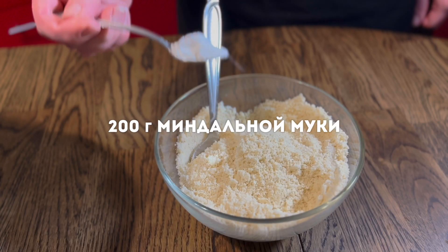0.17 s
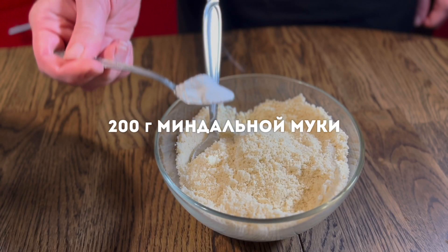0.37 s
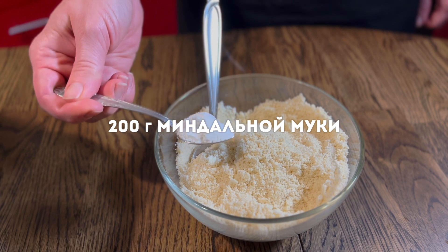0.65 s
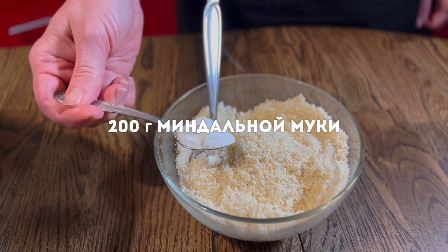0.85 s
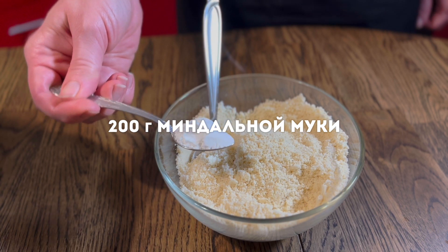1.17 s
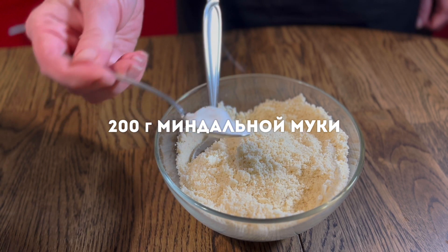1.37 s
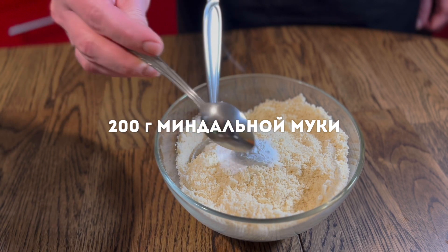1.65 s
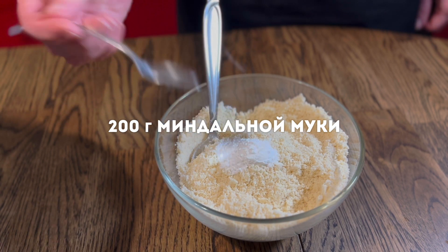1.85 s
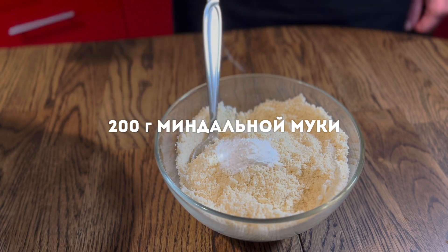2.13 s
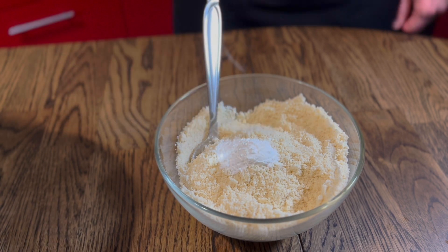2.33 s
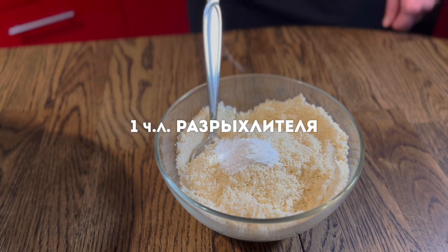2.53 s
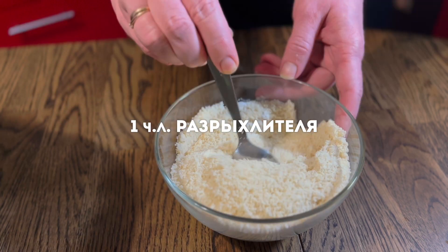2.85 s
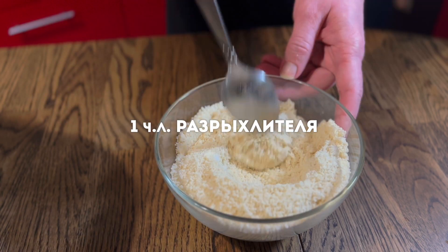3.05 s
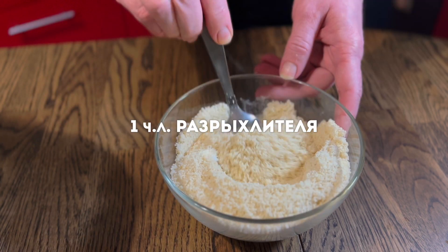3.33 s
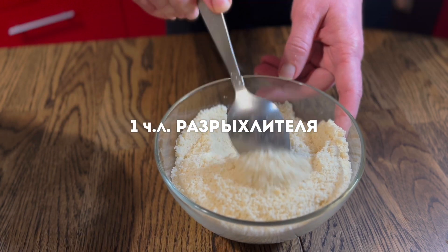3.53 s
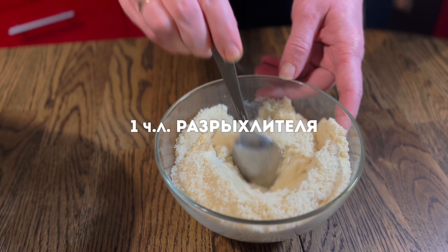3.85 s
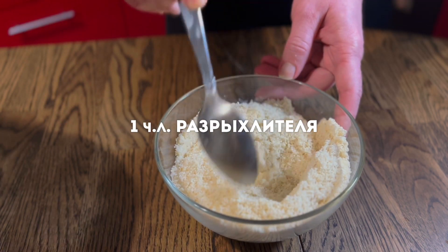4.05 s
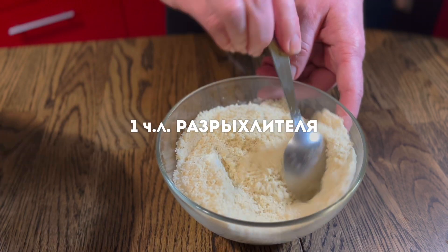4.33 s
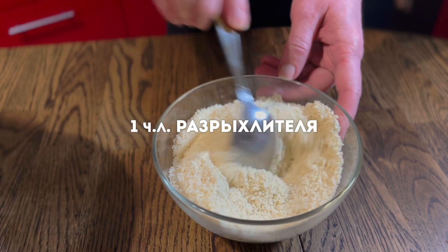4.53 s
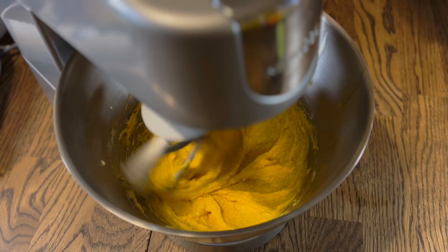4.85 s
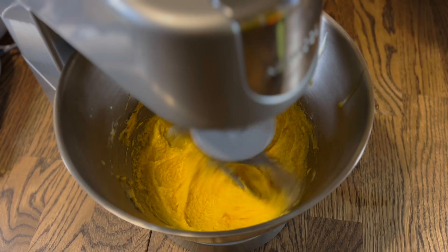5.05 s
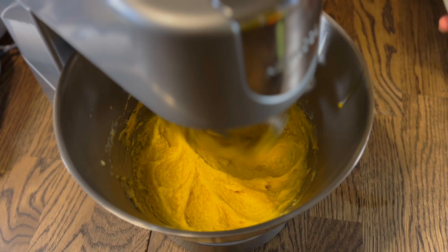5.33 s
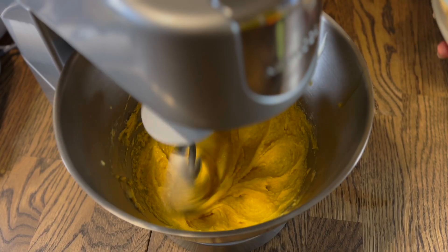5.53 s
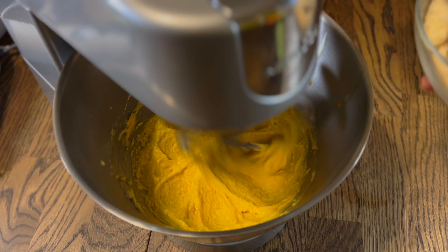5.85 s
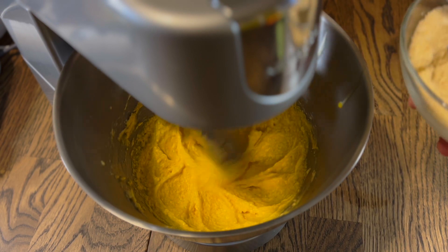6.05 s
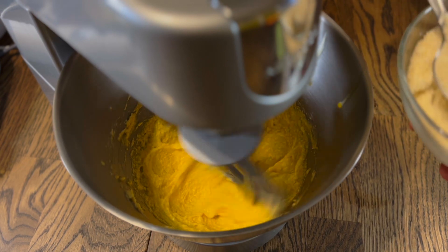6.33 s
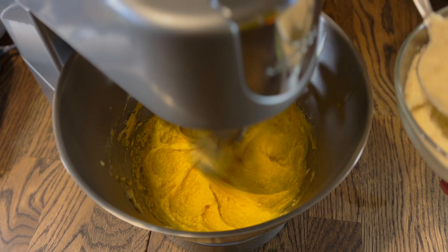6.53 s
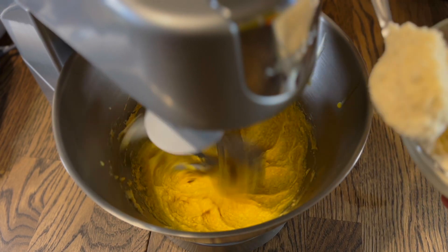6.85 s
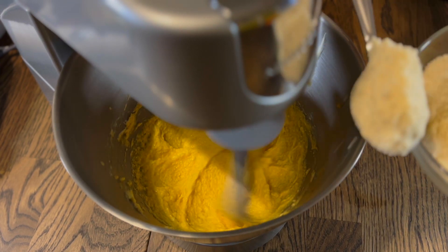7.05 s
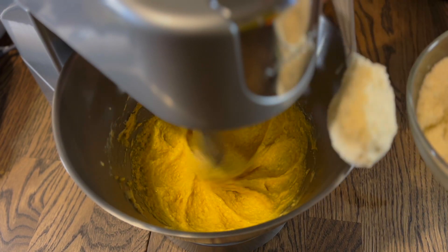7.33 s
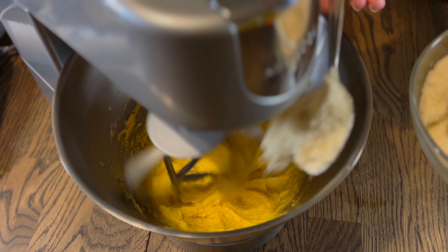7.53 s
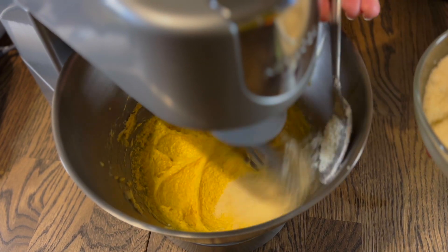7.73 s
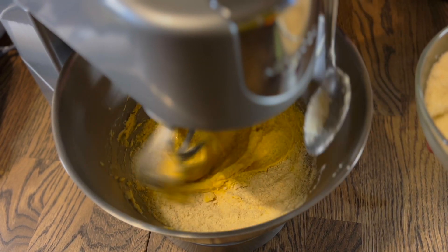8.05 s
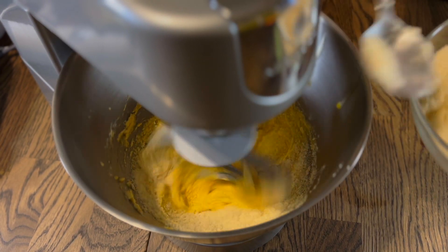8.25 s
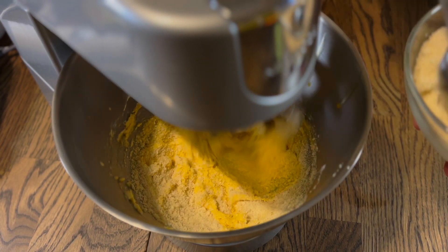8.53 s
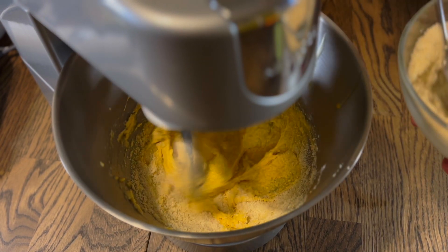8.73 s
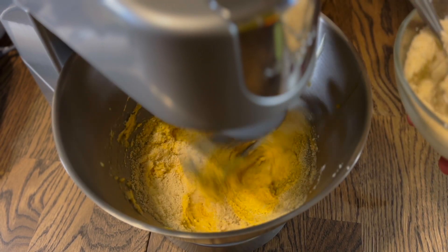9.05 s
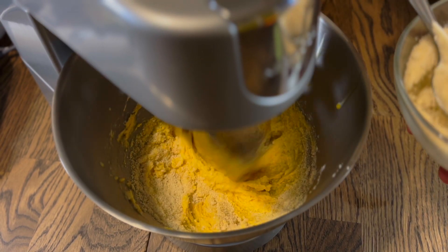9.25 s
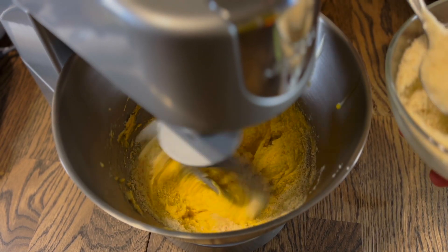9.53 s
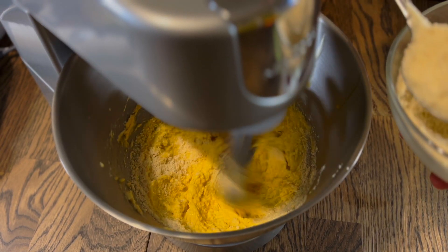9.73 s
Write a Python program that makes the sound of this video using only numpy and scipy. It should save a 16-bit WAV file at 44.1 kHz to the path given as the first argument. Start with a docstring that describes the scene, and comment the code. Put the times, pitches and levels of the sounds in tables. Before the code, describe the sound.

From 0 s an electric stand mixer runs across a small kitchen: a blurred, fluttering whine near 2 kHz over low hum, gear chatter and faint fan hiss. Around 2.8-2.9 s a glass bowl gives several soft low thuds on a wooden table. Spoon strikes on the glass follow at 3.2 s, bright and ringing, and at 3.3 s, duller, with bowl knocks; a quick double click comes at 4.2 s and a sharp, dry one at 4.76 s. At 4.8 s the sound cuts abruptly to the mixer close by, much louder, its whine clear, with rough growling gears and stronger hiss. Until the end near 10 s the whine dips briefly at irregular bites while the rattle surges and hushes. Small spoon taps on steel come at 5.3 s, faint, 7.4 s, clearest, 8.6 and 8.9 s. Close stereo, short room tail.

```python
"""An electric stand mixer whines, rattles, hums and hisses as it beats batter, first from across a kitchen.
A spoon clicks on a glass bowl that knocks on a wooden table; then, all at once, the mixer is heard from
close by, sagging and growling, with spoon taps on its steel bowl. Shaft-locked tones and filtered noise
make the mixer; noise cracks and damped modes make the spoon and bowls, with a short room tail."""
import sys
import numpy as np
from scipy import signal
from scipy.fft import rfft, irfft, next_fast_len
from scipy.io import wavfile
from scipy.ndimage import map_coordinates

SR = 44100
rng = np.random.default_rng(int(sys.argv[2]) if len(sys.argv) > 2 else 0)


def digitize_waveform(pressure):
    """Quantize a signal to 16-bit integers and store it at the path in sys.argv[1].

    Rows of a 2-D input are taken as channels; values are limited to [-1, 1].
    """
    field = np.atleast_2d(pressure).T
    bounded = np.clip(field, -1, 1)
    quanta = np.round(bounded * 32767).astype(np.int16)
    wavfile.write(sys.argv[1], SR, quanta)


N = 435686
TIME = np.arange(N) / SR
STRIKE_T = np.arange(SR // 3) / SR  # time since a strike [s]


def amp(db):
    """Decibels to gain."""
    return 10 ** (np.asarray(db) / 20)


def unit(x):
    """Scale to rms 1."""
    return x / np.sqrt(np.mean(x ** 2) + 1e-20)


def along(points, hz):
    """(Hz, value) points read on a log axis."""
    point_hz, value = np.transpose(points)
    return np.interp(np.log(hz + 1), np.log(point_hz + 1), value)


def wobble(rate_hz):
    """A smooth random curve with rate_hz knots a second."""
    coarse_s = np.arange(0, TIME[-1], 1 / 1000)
    knots = rng.standard_normal(4096)
    return np.interp(TIME, coarse_s, map_coordinates(knots, [coarse_s * rate_hz], mode="wrap"))


def filtered(x, response):
    """x times a response of frequency, zero-padded."""
    n = x.shape[-1]
    padded = next_fast_len(n + SR // 4, True)
    return irfft(rfft(x, padded) * response(np.fft.rfftfreq(padded, 1 / SR)), padded)[..., :n]


def add(track, start_s, sound):
    """Mix a sound into a track from start_s."""
    part = track[..., round(start_s * SR):][..., :sound.shape[-1]]
    part += sound[..., :part.shape[-1]]


def motor_turns(whine_hz, flutter_hz, jitter_hz):
    """Shaft turns so far: one whine cycle per armature slot, fluttered by lumps, jittered by gears."""
    slots = 19
    pitch_hz = whine_hz + flutter_hz * wobble(24) + jitter_hz * wobble(70)
    return np.cumsum(pitch_hz) / slots / SR


def tones(rows, turns, width_hz):
    """Lines locked to the shaft; play between the teeth makes each one waver."""
    out = np.zeros(N)
    for multiple, db, rough in rows:
        cycles = multiple * turns
        angle = 2 * np.pi * (cycles - np.floor(cycles)).astype(np.float32)
        cosine, sine = np.cos(angle), np.sin(angle)
        wavering = wobble(width_hz) * cosine + wobble(width_hz) * sine
        out += amp(db) * (np.sqrt(2 * (1 - rough)) * cosine + np.sqrt(rough) * wavering)
    return out


def hum(close):
    """The motor's iron buzzes at multiples of twice the mains frequency."""
    # (frequency [Hz], rms level far [dB], rms level near [dB])
    hum_lines = [(100.2, -42.5, -49.5), (200.3, -57, -54), (299.9, -51.5, -41.5), (400.2, -47, -43.5)]
    out = np.zeros(N)
    for hz, far_db, near_db in hum_lines:
        level = np.sqrt(2) * amp(near_db if close else far_db)
        out += level * np.sin(2 * np.pi * hz * TIME + rng.uniform(0, 2 * np.pi))
    return out


def grind(turns, spectrum, repeat, rattle_db, count=10):
    """Two noises of rms 1, chopped by rattle; a share repeats every count turns with the worn parts."""
    surface = rng.standard_normal((2, 400 * count))
    fine = signal.resample(surface, 8 * surface.shape[1], axis=1)
    position = (turns / count * fine.shape[1]).astype(int) % fine.shape[1]
    worn = fine[:, position]
    drive = np.sqrt(repeat) * worn + np.sqrt(1 - repeat) * rng.standard_normal((2, N))
    return unit(filtered(drive * amp(rattle_db), lambda hz: amp(along(spectrum, hz))))


def at_microphones(lines, noises, place):
    """Sound reaches two microphones at different levels and phases; the noise is partly unrelated."""
    # likeness of the noise at the two microphones: (frequency [Hz], likeness [0-1])
    alike = [(200, 0.97), (500, 0.93), (900, 0.9), (1500, 0), (1950, 0.78), (2500, 0.64), (5000, 0.27),
             (7000, 0.48), (7800, 1), (9300, 1), (9900, 0), (10600, 1), (13500, 0.93), (14500, 0.3)]
    balance, lead = place

    def mid_side_gains(hz):
        angle = np.arccos(np.clip(along(alike, hz), 0, 1)) / 2
        return np.array([np.cos(angle), np.sin(angle)])

    mid, side = filtered(noises, mid_side_gains)
    pair = np.array([lines + mid + side, lines + mid - side])
    half = np.array([[.5], [-.5]])
    return filtered(pair, lambda hz: amp(half * along(balance, hz)) * np.exp(1j * half * along(lead, hz)))


def drag():
    """Batter drags on the beater in a few rhythms at once, swinging the far whine [Hz]."""
    # (drags per second [Hz], whine swing either way [Hz])
    rhythms = [(3.74, 7), (4.93, 5), (10.5, 7), (14.4, 10)]
    return sum(swing_hz * np.cos(2 * np.pi * (rate_hz * TIME + rng.random())) for rate_hz, swing_hz in rhythms)


def mixer_far():
    """Across the kitchen the whine is smeared and the casing chatters with the gears."""
    # shaft and gear-tooth tones: (multiple of motor speed [ratio], level [dB], roughness [0-1])
    tone_rows = [(0.998, -51.5, 0.54), (1.345, -48.5, 0.36), (1.623, -50, 0.06), (3.123, -50.5, 0.44),
                 (4.19, -44, 0.78), (4.314, -48.5, 0.5), (8.37, -53, 0.3), (11.01, -45, 0.7),
                 (11.97, -47.5, 0.7), (13.78, -54, 0.83), (18.83, -46.5, 0.43), (19.7, -50, 0.6),
                 (21.2, -52.5, 0.33), (31.27, -61, 0.8), (45.8, -67.5, 0.8), (65.2, -67.5, 0.76)]
    # noise spectra: (frequency [Hz], relative density [dB per Hz])
    gear_spectrum = [(25, -25), (45, -19), (62, -0.5), (100, 1.5), (150, -4), (190, 1), (225, -9.5),
                     (300, 0), (355, -7.5), (430, 4), (490, 2), (540, -7), (700, -4), (900, -47)]
    casing_spectrum = [(410, -20), (700, -14.5), (767, -9), (851, -6.5), (978, -9.5), (1110, -1.5),
                       (1440, -16), (1540, -10.5), (1950, -0.5), (2240, -14), (2320, -19), (3000, -23),
                       (3900, -64), (6600, -120)]
    fan_spectrum = [(2300, -12), (3000, 0), (3800, -0.5), (4750, 1.5), (5200, -4.5), (6700, -8.5),
                    (8500, -10.5), (10500, -13.5), (13500, -22.5), (15000, -30)]
    # position: (frequency [Hz], left minus right [dB]), (frequency [Hz], left lead [rad])
    place = ([(60, -1), (150, 1), (380, 2.5), (950, 2.5), (2380, 6.5), (5970, 3), (15000, -3.5)],
             [(150, 0.1), (400, 1.26), (1200, 2.47), (1800, 0.17), (3200, 1.4), (5000, 0.028)])
    mean_whine_hz = 1942
    turns = motor_turns(mean_whine_hz - drag(), flutter_hz=7, jitter_hz=11)
    chatter = np.cos(2 * np.pi * turns * 4 / 9)
    gear_rattle_db = .7 * chatter + .7 * wobble(14)
    casing_rattle_db = 1.1 * chatter + .7 * wobble(25)
    gears = amp(-38.0) * grind(turns, gear_spectrum, repeat=0.36, rattle_db=gear_rattle_db)
    casing = amp(-38.5) * grind(turns, casing_spectrum, repeat=0.43, rattle_db=casing_rattle_db)
    fan = amp(-52.0) * grind(turns, fan_spectrum, repeat=0.42, rattle_db=0.59 * chatter, count=1)
    lines = tones(tone_rows, turns, width_hz=20) + hum(close=False)
    return at_microphones(lines, gears + casing + fan, place)


def ring(modes, t):
    """Damped modes, struck at slightly new strengths."""
    out = np.zeros(len(t))
    for hz, db, t60_s in modes:
        out += amp(db + rng.normal(0, 2) - 60 * t / t60_s) * np.sin(2 * np.pi * hz * t)
    return out


def bowl_knocks():
    """The glass bowl rocks on the table: table thud, foot clack and rim ring as damped modes."""
    # (time [s], thud [dB], clack [dB], rim ring [dB]), relative levels
    knocks = [(2.832, -27, -53, -70), (2.855, -34, -52, -70), (2.885, -34, -46, -70), (2.94, -34, -60, -70),
              (3.178, -30, -32, -40), (3.333, -33, -30, -36), (3.352, -30.5, -32, -47),
              (4.171, -38, -35, -26), (4.178, -28, -31.5, -39), (4.7605, -31, -35, -41)]
    # modes: (frequency [Hz], relative level [dB], t60 [s])
    table_modes = [(81.5, -20, 0.2), (115, -2.5, 0.18), (172, -9, 0.12), (243, 2, 0.088),
                   (293, -0.5, 0.067), (390, -7.5, .08)]
    foot_modes = [(459, 5, 0.12), (590, 0.5, 0.065)]
    rim_modes = [(1310, -1, 0.055), (1405, 0.5, 0.076), (1495, 0, 0.064)]
    out, t = np.zeros((2, N)), STRIKE_T
    onset = 1 - np.exp(-t / 0.0012)
    for start_s, thud_db, clack_db, rim_db in knocks:
        thud = amp(thud_db) * ring(table_modes, t)
        clack = amp(clack_db) * ring(foot_modes, t)
        rim = amp(rim_db) * ring(rim_modes, t)
        add(out, start_s, onset * (thud + clack + rim))
    return out


def crack(t, tilt_db, t60_s):
    """Noise burst of a hard contact, partly unrelated at each microphone; tilt_db per octave brightens it."""
    # (frequency [Hz], relative density [dB per Hz])
    crack_spectrum = [(100, -24), (400, -3), (1200, 6), (2400, 8), (4800, 6.5), (6500, 4), (8000, -9.5),
                      (10500, 6.5), (15000, -11)]
    spread = 0.69  # unrelated share of the power [0-1]
    common = rng.standard_normal(len(t))
    unrelated = rng.standard_normal((2, len(t)))
    noise = np.sqrt(1 - spread) * common + np.sqrt(spread) * unrelated

    def response(hz):
        octaves = np.log2(np.maximum(hz, 500) / 4000)
        return amp(along(crack_spectrum, hz) + tilt_db * octaves)

    return unit(filtered(noise, response)) * amp(-60 * t / t60_s)


def glass_clicks():
    """Spoon on the glass bowl: a dry crack, then glass, spoon and handle ring as damped modes."""
    # (time [s], crack [dB], brightness [dB per octave], glass ring [dB], spoon ring [dB],
    #  handle ring [dB]), relative levels
    clicks = [(3.1743, -14, -0.5, -27.5, -32, -43), (3.333, -28, -15, -51, -64, -70),
              (4.1706, -16, -3, -50, -19, -57), (4.1773, -20, -5.5, -43, -27, -47),
              (4.76, -13, 5, -54, -45, -27), (4.7624, -19, -1, -53, -50, -35)]
    # modes: (frequency [Hz], relative level [dB], t60 [s])
    glass_modes = [(2080, 6, 0.045), (2260, 7, .035), (2450, 6, 0.035), (2966, -1, 0.15), (3100, 0, .035),
                   (3381, -11, .1), (4511, -7.5, 0.1), (4940, -11, 0.07), (6340, -11, .1), (9470, -2, 0.05),
                   (10820, -17, 0.19), (11895, -7, 0.06)]
    spoon_modes = [(2560, -7, 0.02), (2690, -1, 0.02), (3870, -4, 0.021), (4060, -11, 0.019),
                   (6100, -2, 0.026), (13550, -16, .03)]
    handle_modes = [(780, -2, .03), (1220, 0, .03), (1933, 0, .05), (4180, -1, .02), (4646, 1, .04),
                    (6325, 0, .03), (9545, 3, .03), (10960, -4, .04), (13110, -3, .03)]
    out, t = np.zeros((2, N)), STRIKE_T
    onset = 1 - np.exp(-t / 0.0005)
    for start_s, crack_db, tilt_db, glass_db, spoon_db, handle_db in clicks:
        burst = amp(crack_db) * crack(t, tilt_db, t60_s=0.017)
        glass = amp(glass_db) * ring(glass_modes, t)
        spoon = amp(spoon_db) * ring(spoon_modes, t)
        handle = amp(handle_db) * ring(handle_modes, t)
        add(out, start_s, onset * (burst + glass + spoon + handle))
    return out


def bumps(rows, half_s):
    """One Gaussian bump per (time, height) row; half_s is the 1/e half-width."""
    return sum(height * np.exp(-np.minimum(((TIME - s) / half_s) ** 2, 20)) for s, height in rows)


def drone(turns):
    """Gear tones that fade and swell as the load goes round with the beater."""
    # (multiple of motor speed [ratio], level [dB], roughness [0-1], swell depth [0-1],
    #  swells per orbit [ratio], time of a weakest moment [s])
    drone_rows = [(1.318, -38.5, 0.05, .85, .532, 7.35), (3.62, -38, .35, .55, 1, 7.8),
                  (4.005, -35.5, 0.2, .7, 1, 7.37), (5.47, -41.5, .12, .8, 1, 7.81)]
    orbit_s = .66  # the beater circles the bowl while it spins
    out = np.zeros(N)
    for multiple, db, rough, depth, per_orbit, weakest_s in drone_rows:
        swell = 1 - depth * np.cos(2 * np.pi * per_orbit * (TIME - weakest_s) / orbit_s)
        out += np.sqrt(swell) * tones([(multiple, db, rough)], turns, width_hz=15)
    return out


def mixer_near():
    """Close by, the clear whine sags at each bite; gears growl in surges, knocking twice per big-gear turn."""
    # shaft and gear-tooth tones: (multiple of motor speed [ratio], level [dB], roughness [0-1])
    tone_rows = [(0.999, -39, 0.021), (1.103, -51.5, .2), (2.98, -42.5, 0.53), (4.386, -36, 0.48),
                 (4.454, -38, 0.28), (4.534, -40.5, 0.34), (4.65, -39, 0.53), (8.85, -51, 0.17),
                 (10.92, -52, 0.4), (13.06, -53, 0.36), (15.9, -52, 0.17), (17.05, -52, 0.22),
                 (17.85, -51, 0.1), (18.98, -34, 0.02), (19.93, -41.5, 0.033), (21, -49.5, 0.1),
                 (23.05, -57, .3), (24.08, -46.5, 0.24), (25.05, -49, 0.42), (27, -54, .3),
                 (40.15, -58, 0.58), (43.2, -53.5, 0.24), (52.6, -53.5, 0.34), (55.9, -54.5, 0.34),
                 (60, -60, 0.36), (96.5, -58.5, 0.53)]
    # noise spectra: (frequency [Hz], relative density [dB per Hz])
    gear_spectrum = [(25, -40), (45, -26), (65, -11), (120, -14), (170, -16.5), (240, -13), (295, -2),
                     (340, -10), (420, 0.5), (470, 2.5), (510, -5), (545, -11.5), (700, -13.5), (900, -80)]
    casing_spectrum = [(550, -23), (700, 0.5), (900, 3), (980, -1.5), (1130, -1), (1480, -2), (1750, 1.5),
                       (1880, 4), (1960, 8.5), (2030, 9), (2110, 3), (2270, -4), (2500, 4), (2750, -9),
                       (3000, -10.5), (3600, -82)]
    fan_spectrum = [(2300, -8.5), (3000, 1.5), (3300, -7), (3800, -3.5), (4450, 2), (5200, -4.5),
                    (5600, 1.5), (6200, -3.5), (6400, -1.5), (7500, -7.5), (9000, -7), (11000, -12),
                    (13300, -17.5), (15000, -30)]
    # position: (frequency [Hz], left minus right [dB]), (frequency [Hz], left lead [rad])
    place = ([(60, -3), (150, 0.5), (380, 1), (950, 4), (2380, 0.5), (5970, 4), (15000, -5)], [(150, 0.28),
             (450, 0.48), (750, 1.29), (1800, 0.76), (2900, 1.33), (4500, 0)])
    # the beater bites into the batter and slows the motor: (time [s], whine sag [Hz])
    bites = [(4.91, 18), (5.21, 34), (5.37, 28), (5.47, 24), (5.68, 24), (5.94, 28), (6.03, 35), (6.82, 27),
             (7.04, 27), (7.37, 35), (7.46, 34), (7.7, 30), (8.1, 29), (8.41, 22), (8.59, 24), (8.67, 31),
             (8.88, 22), (9.08, 26), (9.18, 28), (9.33, 21), (9.44, 28), (9.68, 38)]
    # gears rattle up as the beater breaks free, hush while it is held: (time [s], relative lift [dB])
    surges = [(4.99, 3), (5.09, 3.5), (5.25, 2), (5.36, 3), (5.4, -5), (5.71, 3), (5.76, -2), (5.94, 5),
              (6.13, 3), (6.38, 1.5), (7.07, 2.5), (7.39, -5), (7.66, 2), (7.88, 1.5), (7.97, -7),
              (8.01, 4), (8.34, 4.5), (8.49, 5.5), (8.57, -7), (9.02, 3.5), (9.16, -4), (9.39, 3)]
    whine_hz, gear_ratio = 1973, 4.91
    turns = motor_turns(whine_hz - bumps(bites, half_s=.04), flutter_hz=3.5, jitter_hz=6)
    knock = np.cos(2 * np.pi * 2 * turns / gear_ratio)
    brush = np.cos(2 * np.pi * turns)
    surge_db = bumps(surges, half_s=0.024) + 0.97 * wobble(28)
    gear_rattle_db = 0.71 * surge_db + 2.7 * knock + 2.3 * wobble(70)
    casing_rattle_db = 0.48 * brush + 1.1 * wobble(35)
    gears = amp(-30.5) * grind(turns, gear_spectrum, repeat=0.16, rattle_db=gear_rattle_db)
    casing = amp(-34) * grind(turns, casing_spectrum, repeat=0.48, rattle_db=casing_rattle_db)
    fan = amp(-40) * grind(turns, fan_spectrum, repeat=0.31, rattle_db=0.64 * wobble(30), count=2)
    growl = unit(amp(surge_db)) * drone(turns)
    lines = tones(tone_rows, turns, width_hz=22) + growl + hum(close=True)
    return at_microphones(lines, gears + casing + fan, place)


def struck_at(modes, spot_hz):
    """The same modes, with those near spot_hz favoured by the point of contact."""
    boost_db, width_octaves = 7, 0.11
    favour = lambda hz: boost_db * np.exp(-(np.log2(hz / spot_hz) / width_octaves) ** 2)
    return [(hz, db + favour(hz), t60_s) for hz, db, t60_s in modes]


def steel_taps():
    """Spoon on the mixer's steel bowl: a dry crack and a short ring coloured by the spot struck."""
    # (time [s], crack [dB], ring [dB], favoured ring [Hz]), relative levels
    taps = [(5.284, -36, -34, 10800), (7.391, -22, -24.5, 7100), (8.649, -26, -36, 3400),
            (8.93, -33, -36, 10800)]
    # modes: (frequency [Hz], relative level [dB], t60 [s])
    steel_modes = [(2400, 1, 0.03), (2750, -1, .025), (3400, -2, 0.025), (3840, 0, 0.022),
                   (6870, -3, 0.014), (7350, -1, .012), (10800, -12, .025), (12100, -9, .02)]
    out, t = np.zeros((2, N)), STRIKE_T
    onset = 1 - np.exp(-t / 0.0005)
    for start_s, crack_db, ring_db, spot_hz in taps:
        burst = amp(crack_db) * crack(t, tilt_db=-3, t60_s=0.02)
        steel = amp(ring_db) * ring(struck_at(steel_modes, spot_hz), t)
        add(out, start_s, onset * (burst + steel))
    return out


def kitchen(x):
    """The room's short tail: noise decaying at a rate set by frequency."""
    # (frequency [Hz], t60 [s])
    decay = [(200, 0.11), (3000, 0.29), (12000, 0.15)]
    hz, t, z = signal.stft(rng.standard_normal((2, SR // 2)), SR, nperseg=256)
    fade = amp(-60 * t / along(decay, hz)[:, None])
    tail = signal.istft(z * fade, SR, nperseg=256)[1]
    return signal.fftconvolve(x, tail / np.linalg.norm(tail[0]), axes=1)[:, :N]


def scene():
    """The distant mixer gives way to the close one; the spoon and bowls sound over both."""
    close_at_s, fade_s = 4.805, 0.012
    close = np.clip((TIME - close_at_s) / fade_s + .5, 0, 1)
    mixer = np.sqrt(1 - close) * mixer_far() + np.sqrt(close) * mixer_near()
    strikes = bowl_knocks() + glass_clicks() + steel_taps()
    strikes = strikes * amp([[1.4], [-1.4]])  # left, right [dB]
    return mixer + strikes + amp(-9.5) * kitchen(strikes)


def record(dry):
    """The microphone pair slips apart in phase in the treble and keeps nothing above its band limit."""
    # (frequency [Hz], right lead [cycles])
    slip = [(4800, 0), (7000, .32), (7800, .5), (9300, .5), (10500, 1), (13700, 1), (14800, 1.5)]
    top_hz = 15300
    opposed = np.array([[-1], [1]])
    return filtered(dry, lambda hz: np.exp(1j * np.pi * opposed * along(slip, hz)) * (hz < top_hz))


dry = scene()
out = record(dry)
digitize_waveform(out)
```